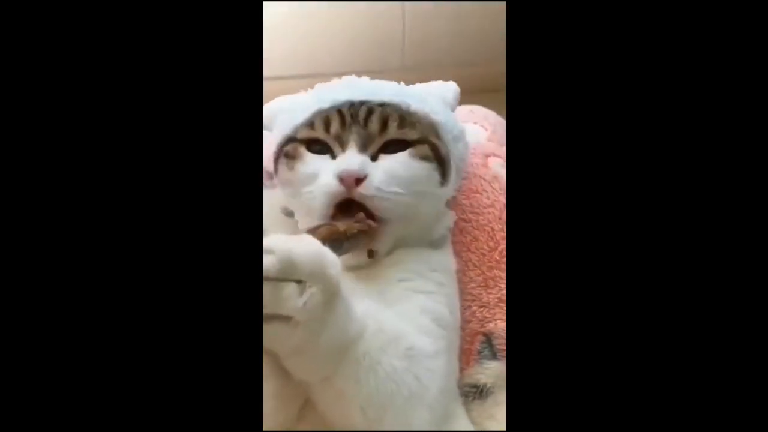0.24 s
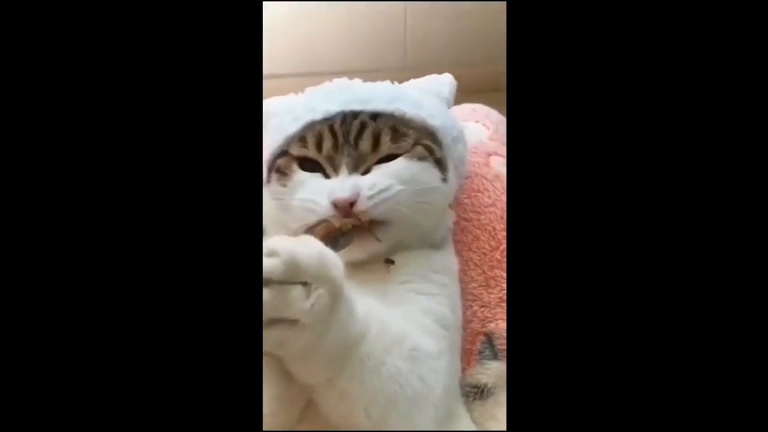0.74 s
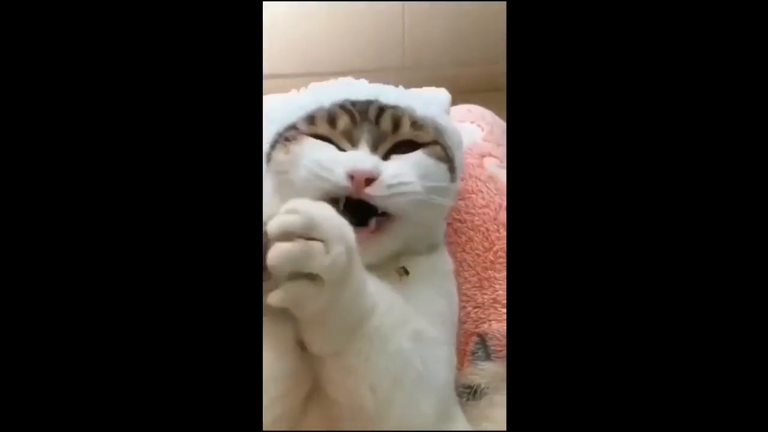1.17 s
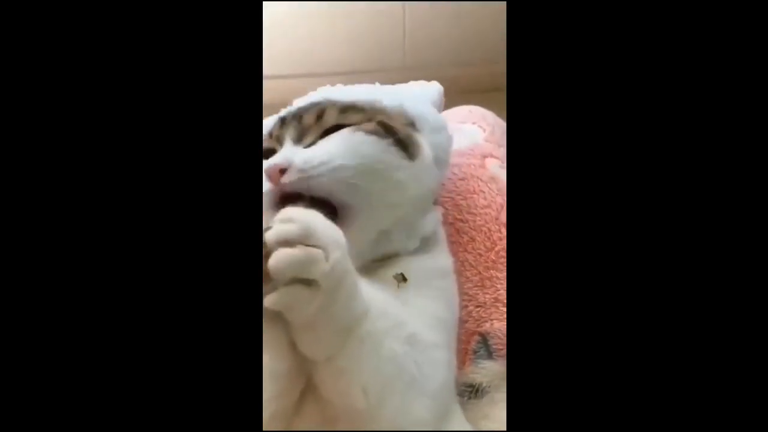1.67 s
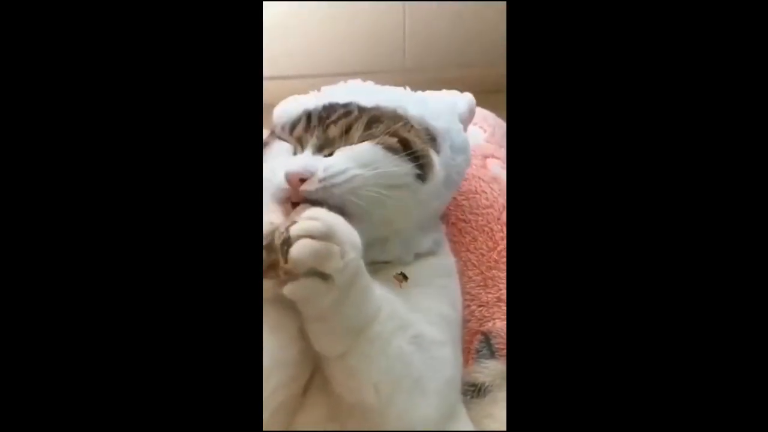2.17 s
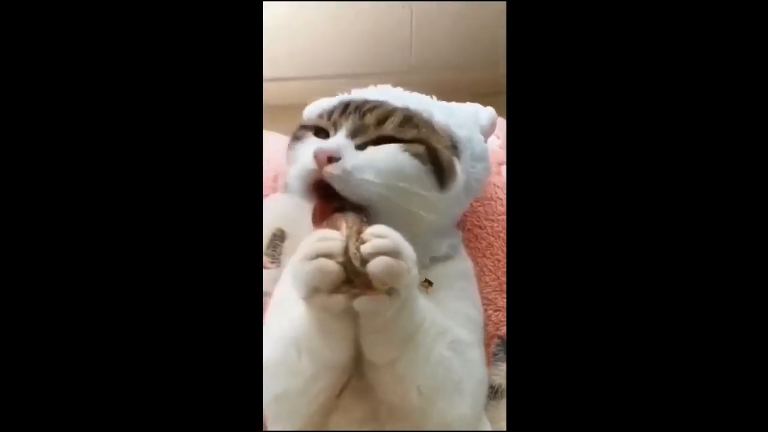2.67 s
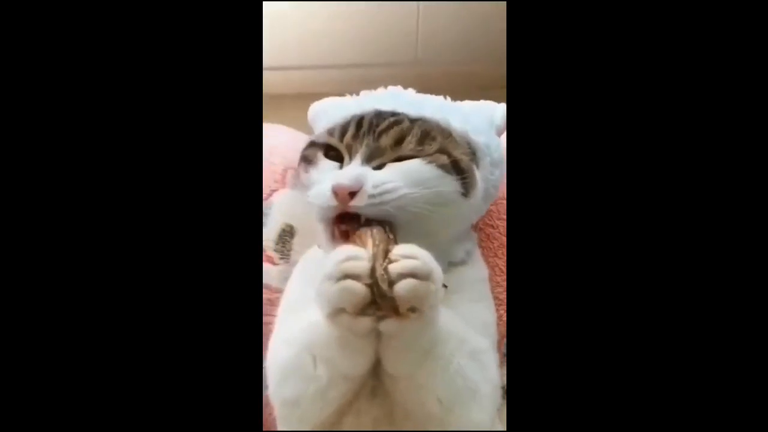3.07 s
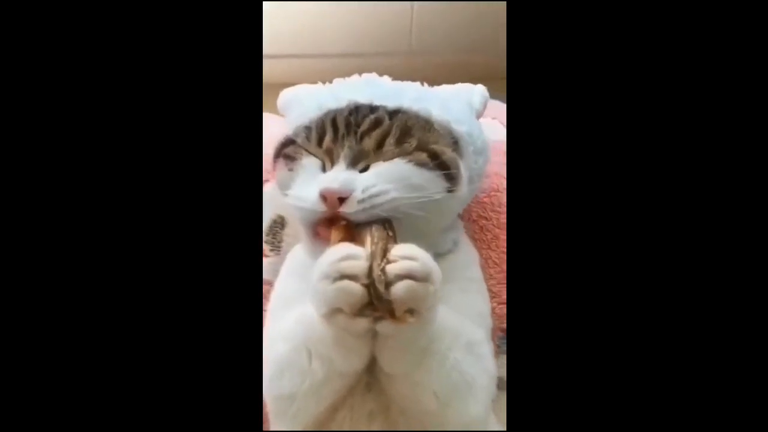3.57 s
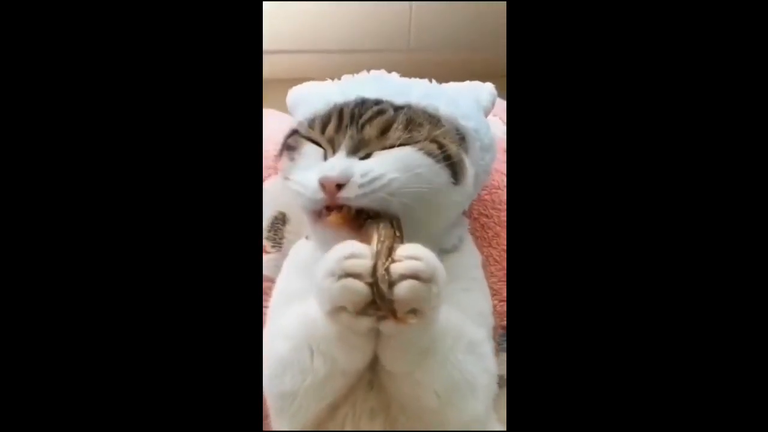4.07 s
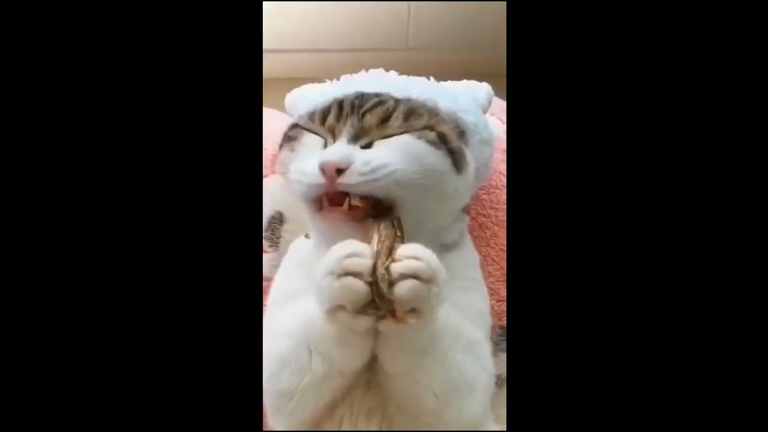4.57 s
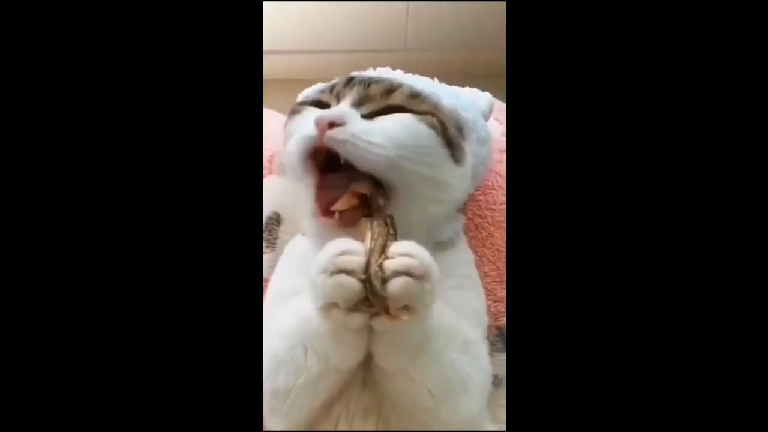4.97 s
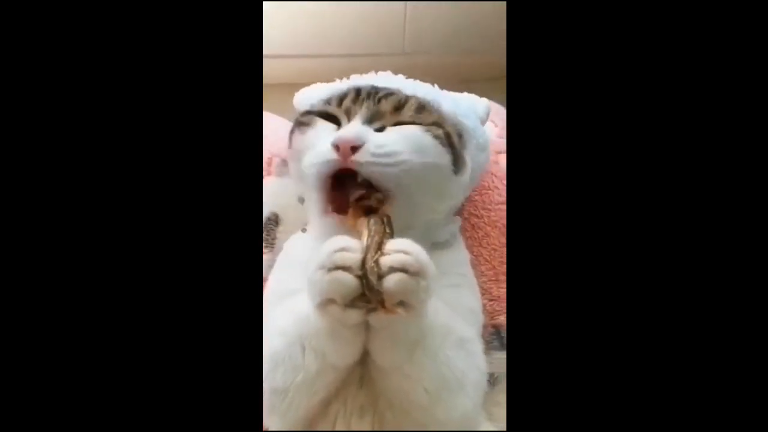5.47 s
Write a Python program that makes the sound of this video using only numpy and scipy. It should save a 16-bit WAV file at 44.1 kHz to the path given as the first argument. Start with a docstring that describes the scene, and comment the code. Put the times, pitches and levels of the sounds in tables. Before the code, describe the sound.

A cat chews a hard dried treat very close to a hand-held microphone in a small room. For the first second there are only soft chews and small wet clicks, with some low handling rumble. From about 1.2 seconds loud, sharp cracks and gritty grinding set in, easing briefly near 1.6. The densest, loudest crunching runs from about 1.9 to 2.7 seconds, with short wet squelches, and the microphone rumbles low between 2.5 and 2.8. Strong grinding bites follow near 2.9 and 3.2 seconds. After that the chewing turns lighter and more splintery, in uneven clusters around 3.9 to 4.2, 4.6 to 4.8 and 5.2 to 5.5 seconds. Each bite is a brittle crackle with a slightly hollow mouth sound, and little pops of tongue and teeth come between them. Faint steady room noise continues until the end at about 5.7 seconds.

```python
"""A small furnished room, a hand-held microphone very close to a cat that gnaws a hard dried treat in its paws.
Each stroke of the jaw grinds through the fibres and sheds crumbs; each crack is a short avalanche of
tiny fractures. Jaw, mouth and treat ring with them, and tongue and teeth add wet pops.
Handling rumble and room noise lie under it all, and a limiter holds down the loudest bites."""
import sys
import numpy as np
from scipy import signal
from scipy.fft import rfft, irfft
from scipy.io import wavfile
from scipy.ndimage import uniform_filter1d, minimum_filter1d

SR = 44100
rng = np.random.default_rng(int(sys.argv[2]) if len(sys.argv) > 2 else 0)


def dump_mix(stems):
    """Bounce the given channels to the path in sys.argv[1] as a 16-bit WAV at rate SR."""
    frames = np.atleast_2d(stems).T  # one column per channel
    limited = np.clip(frames, -1, 1)  # hard clip at full scale
    pcm = np.round(limited * 32767).astype(np.int16)
    wavfile.write(sys.argv[1], SR, pcm)


N = 252693

# Spectra of the room tone and the handling rumble. Each row: frequency in Hz, relative density in dB.
ROOM_TONE_SPECTRUM = [(60, 14.5), (150, 10), (280, 5.5), (450, -2.5), (1000, -5), (2500, -11.5),
                      (4500, -15), (7000, -36.5), (9500, -23)]
RUMBLE_SPECTRUM = [(15, -4), (24, 0), (35, -4.5), (50, -1.5), (70, -11), (110, -23), (200, -33),
                   (400, -46.5)]
# Shifts of the hand on the microphone. Each row: start in seconds, hold in seconds, level in dB.
HAND_SHIFTS = [(0.0, 0.11, -15.5), (0.17, 0.02, -14), (0.329, 0.092, -13), (0.514, 0.03, -19.5),
               (0.657, 0.015, -16.5), (0.766, 0.032, -22.5), (0.91, 0.015, -23.5), (1.363, 0.03, -27.5),
               (1.67, 0.02, -30), (2.546, 0.034, -8.5), (2.69, 0.051, -8.5), (2.802, 0.023, -8),
               (3.106, 0.016, -21.5), (3.261, 0.01, -23), (3.988, 0.023, -15), (4.219, 0.089, -15.5),
               (4.906, 0.016, -20.5), (5.232, 0.03, -31)]

# Resonances of the five ringing parts, before the bite shifts them.
# Each row: frequency in Hz, bandwidth in Hz, relative strength in dB.
JAW_MODES = [(260, 290, -6.5), (407, 110, 2), (523, 123, -0.5), (790, 370, -13.5)]
MOUTH_MODES = [(880, 130, -10), (1076, 103, 10.5), (1222, 560, 3), (1380, 160, -9)]
TREAT_MODES = [(1750, 405, -1.5), (2120, 640, -1.5), (2365, 266, 1.5), (2852, 320, -6)]
SPLINTER_MODES = [(3130, 213, 0.24), (4253, 430, 0.92), (5790, 1150, -0.61), (6680, 1020, 0.1)]
FINE_FIBRE_MODES = [(7380, 570, -6.8), (8960, 290, 2.5), (10400, 610, 4)]
# The band each of those parts radiates, in the same order. Each row: low edge in Hz, high edge in Hz.
PART_BANDS = [(190, 830), (760, 1520), (1400, 6140), (3200, 6980), (6700, 8570)]
# At a crack an open mouth rings more and the jaw less.
# Each row: time in seconds, dB added to the mouth and taken from the jaw.
OPEN_MOUTH = [(0.0, -2), (0.87, -9.5), (1.22, 6.5), (1.5, -2), (1.95, 6), (2.45, -1.5), (3.4, 2),
              (3.97, -2), (4.15, 3), (4.7, -2), (5.73, -3)]

# Pitched mouth sounds, from short pops and knocks to long squelches and scrapes.
# Each row: start in seconds, length in seconds, pitch in Hz, level in dB.
MOUTH_POPS = [(0.008, 0.05, 1120, -30), (0.3398, 0.00073, 2200, -17.5), (0.7446, 0.00094, 2380, -21),
              (0.893, 0.027, 1750, -29), (0.899, 0.049, 1030, -28.5), (1.105, 0.00092, 3130, -17.5),
              (1.179, 0.0017, 2490, -23), (1.189, .004, 2460, -18.5), (1.2189, 0.0017, 2430, -12.5),
              (1.2204, .002, 1140, -13), (1.753, 0.023, 285, -22), (1.759, 0.018, 1170, -17),
              (1.795, 0.15, 2280, -18.5), (2.013, 0.0016, 1097, -13), (2.449, 0.076, 3640, -9.5),
              (2.574, 0.013, 348, -18.5), (2.692, 0.069, 1930, -16), (3.078, 0.045, 260, -25.5),
              (3.26, .0043, 2470, -16), (3.4, 0.0039, 1046, -16), (3.4007, 0.00085, 511, -16),
              (3.665, 0.019, 1800, -20), (3.739, 0.073, 1750, -21.5), (3.896, 0.016, 3000, -11),
              (3.964, 0.0036, 337, -19.5), (4.25, 0.0034, 550, -15), (4.44, .0012, 1790, -26.5),
              (4.444, .063, 1810, -29.5), (4.611, 0.027, 2820, -13), (4.74, .003, 428, -20),
              (4.852, 0.0024, 446, -17.5), (5.244, .0015, 1070, -18.5), (5.55, 0.044, 2560, -29)]
# Faint rubbing of the treat between strokes. Each row: time in seconds, level in dB.
TREAT_RUBBING = [(0.0, -46), (1.05, -46.5), (1.7, -43.5), (2.8, -32), (3.6, -41), (4.4, -41), (4.8, -33.5),
                 (5.0, -43.5), (5.5, -35), (5.73, -39.5)]
# Strokes of the jaw through the fibres. Each row: start in seconds, hold in seconds, level in dB,
# then hollow ring (jaw and mouth) and splinters, both in dB relative to that level.
JAW_STROKES = [(0.066, 0.012, -32, -18, -23), (0.406, 0.015, -29, -13, -30), (0.742, 0.011, -35, -3.5, -12),
               (0.86, 0.01, -35.5, -6, 3.5), (1.112, 0.012, -29, -4.5, -10), (1.192, 0.015, -28.5, -8, -11),
               (1.29, 0.078, -22, -2, -7.5), (1.391, 0.097, -17.5, -11.5, -3.5),
               (1.538, 0.016, -24.5, 0, -6), (1.653, 0.15, -30, -4.5, -9), (1.906, 0.0088, -19, -2.5, -7),
               (1.961, 0.12, -19, -5, -0.5), (2.119, 0.27, -16.5, -11.5, 0), (2.44, 0.058, -18, -10, -2.5),
               (2.543, 0.22, -24.5, -13, -5), (2.912, 0.085, -15.5, -9, 0.5), (3.231, 0.11, -19, -8.5, 1.5),
               (3.39, 0.16, -33, -5, 1.5), (3.637, 0.012, -29.5, -9.5, -1),
               (3.749, 0.025, -26, -15.5, -7.5), (3.889, 0.033, -21.5, -10, -0.5),
               (3.995, 0.047, -29.5, 0, 8), (4.118, 0.029, -32, -3.5, 5.5), (4.253, 0.011, -30, 4.5, -0.5),
               (4.604, 0.08, -22.5, -9.5, 3), (4.832, 0.01, -32, 2, 10.5), (5.177, 0.081, -22, -5.5, 2.5),
               (5.302, 0.057, -24, -5.5, 5), (5.452, 0.033, -36, 5, 10)]
# The distinct cracks. Each row: start in seconds, length in seconds, level of the treat's ring in dB,
# then hollow ring and splinters, both in dB relative to that level.
TREAT_CRACKS = [(0.655, 0.0041, -45.5, -5, 15), (0.84, 0.0013, -31.5, -14, 6.5),
                (0.872, 0.0015, -36.5, 1.5, 13), (1.107, 0.0015, -23.5, -21, -10),
                (1.216, 0.0019, -20, -7, -9), (1.265, 0.0068, -8.5, -8.5, -17.5),
                (1.304, 0.011, -16, -28, -4.5), (1.343, 0.0059, -11, -15, -8), (1.41, 0.019, -14, -15, 0.5),
                (1.455, 0.0088, -14, -5, 1.5), (1.551, 0.0011, -21, -10, -19),
                (1.659, 0.0022, -19.5, -10.5, -4), (1.737, 0.0066, -19.5, -14.5, -3.5),
                (1.903, 0.0044, -7.5, -12.5, -8.5), (1.939, 0.012, -7.5, -8.5, -12),
                (1.988, 0.024, -15, -6.5, -4.5), (2.031, .004, -16, -15, -4),
                (2.058, .0016, -23.5, -4, 4.5), (2.129, .0031, -15.5, -16.5, -3),
                (2.209, 0.0074, -13, -9.5, -3), (2.267, 0.007, -13.5, -10.5, -3.5),
                (2.308, 0.002, -21, -10.5, -1), (2.333, .0018, -18, -10, 0), (2.39, 0.0041, -13, -14, -2),
                (2.427, 0.011, -9.5, -9, -3.5), (2.489, 0.0026, -17.5, -32, -13),
                (2.509, 0.0089, -11.5, -19.5, -4), (2.54, 0.0096, -12, -17, -4),
                (2.577, 0.0055, -20, -17, -7), (2.602, 0.0018, -16, -12, -7.5),
                          (2.685, 0.0053, -17.5, -11, -8.5), (2.702, 0.0051, -19.5, -15, -10.5),
                (2.788, 0.0029, -21, -21, -6), (2.883, 0.014, -15.5, -27, 2.5),
                (3.017, 0.0035, -22.5, -8, 5.5), (3.178, 0.0029, -28, -26, 1),
                (3.213, 0.0042, -24.5, -20, 3.5), (3.271, 0.0018, -20.5, -5.5, -8),
                (3.396, 0.0042, -17, -3, -3), (3.474, 0.0036, -23, -11, 5),
                (3.515, 0.003, -18.5, -9.5, 0.5), (3.547, .011, -29.5, -7, 4.5), (3.623, .004, -26, -10, 2),
                (3.664, 0.0019, -31, -0.5, -0.5), (3.731, 0.0032, -25, -20, -3.5),
                (3.841, 0.0036, -27, -25, 2), (3.904, 0.005, -18, -30, -0.5), (3.964, 0.0043, -11, -13, -3),
                (4.08, 0.0058, -23.5, -4, 8), (4.117, 0.0022, -19, -10, 2), (4.204, 0.0085, -22.5, -2, 3.5),
                (4.249, 0.0033, -23.5, 3.5, 0), (4.399, 0.0016, -35.5, -13, 3.5),
                (4.556, .0039, -33, -24, 6), (4.593, 0.018, -23.5, -24, 7), (4.651, .0051, -20, -10, 1.5),
                (4.675, 0.0021, -14, -18, -7), (4.733, 0.0067, -17, -5, 2), (4.798, 0.004, -33.5, 0, 11.5),
                (4.845, 0.0043, -23, 2, 2), (4.94, 0.0046, -39.5, -23, 9.5),
                (5.162, 0.0027, -34, -19, 12.5), (5.174, 0.01, -16.5, -25, 3), (5.22, .002, -18.5, -11, 2),
                (5.276, 0.0078, -16.5, -7.5, 3.5), (5.31, 0.0077, -25, -13, 8),
                (5.341, 0.0094, -31, -4, 1.5), (5.432, .0025, -36.5, -6, 14),
                (5.458, 0.0031, -20, -0.5, 3.5)]


def from_db(db):
    """Decibels to gain."""
    return 10 ** (np.asarray(db) / 20)


def rms_one(x):
    """Scale to an rms of 1."""
    return x / np.sqrt(np.mean(x ** 2) + 1e-20)


def energy_one(x):
    """Scale to an energy of 1."""
    return x / np.sqrt(np.sum(x ** 2) + 1e-20)


def evened(x, span_s):
    """Hold the rms near 1 over the given span, keeping all faster detail."""
    return x / np.sqrt(np.abs(uniform_filter1d(x ** 2, int(span_s * SR))) + 1e-12)


def swell(start_s, hold_s, rise_db_per_s, fall_db_per_s):
    """A gain over time that reaches full at start_s, holds and falls away."""
    age = np.arange(N) / SR - start_s
    return from_db(np.clip(np.minimum(age * rise_db_per_s, (hold_s - age) * fall_db_per_s), -120, 0))


def add(out, start_s, sound, db):
    """Mix in a sound with the energy of 10 ms at the given rms level."""
    start = int(start_s * SR)
    sound = from_db(db) * np.sqrt(SR / 100) * energy_one(sound)
    out[start:start + len(sound)] += sound[:N - start]


def coloured_noise(spectrum):
    """Steady noise with the given spectrum, rms 1."""
    hz, db = np.transpose(spectrum)
    bin_hz = np.maximum(np.fft.rfftfreq(N, 1 / SR), 1)
    gain = from_db(np.interp(np.log(bin_hz), np.log(hz), db, left=-60, right=-90))
    return rms_one(irfft(rfft(rng.standard_normal(N)) * gain, N))


def room(x, near_db, near_t60_s, far_db, far_t60_s, dull_hz):
    """The direct sound, quick reflections from things nearby, then a short, duller tail."""
    t = np.arange(SR // 2) / SR
    near, far = rng.standard_normal((2, len(t))) * (t > .002)
    far = signal.sosfilt(signal.butter(1, dull_hz, fs=SR, output="sos"), far)
    reflections = from_db(near_db) * energy_one(near * from_db(-60 * t / near_t60_s))
    tail = from_db(far_db) * energy_one(far * from_db(-60 * t / far_t60_s))
    return x + signal.oaconvolve(x, reflections + tail)[:N]


def handling(gain_db, steady_hand_db):
    """Slow, lumpy rumble as the hand that holds the microphone shifts."""
    power = from_db(steady_hand_db) ** 2
    for start, hold, db in HAND_SHIFTS:
        nudge = from_db(db) * swell(start, hold, rise_db_per_s=400, fall_db_per_s=176)
        power = power + nudge ** 2
    return from_db(gain_db) * np.sqrt(power) * evened(coloured_noise(RUMBLE_SPECTRUM), span_s=.06)


def fractures(per_s, spread_db, size):
    """Clicks at random moments: many small ones, a few large."""
    breaks = rng.random(size) < per_s / SR
    strengths = from_db(spread_db * np.minimum(rng.exponential(1, size), 4))
    return breaks * strengths * rng.choice([-1, 1], size)


def avalanche(length_s, per_s, spread_db, first_snap, fade, rise, size=2600):
    """A first snap sets off a run of clicks that swells and dies; rise and fade scale with length_s."""
    age = np.arange(size) / SR / length_s
    clicks = fractures(per_s, spread_db, size) * (1 - np.exp(-age / rise)) * np.exp(-fade * age)
    clicks[0] = first_snap
    return clicks


def mouth_pops(width_share, tick_db, tick_band_hz):
    """Tongue and teeth set one resonance ringing, with a wet tick; the pitch depends on the jaw's set."""
    out = np.zeros(N)
    wet = signal.butter(2, tick_band_hz, "band", fs=SR, output="sos")
    for start, length, hz, db in MOUTH_POPS:
        half_width = width_share * hz / 2
        cavity = signal.butter(2, [hz - half_width, hz + half_width], "band", fs=SR, output="sos")
        clicks = avalanche(length, per_s=2400, spread_db=4.5, first_snap=5.5,
                           fade=0.92, rise=0.13, size=12000)
        add(out, start, signal.sosfilt(cavity, clicks), db)
        add(out, start, signal.sosfilt(wet, clicks), db + tick_db)
    return out


def part_ring(modes, band_hz, stretch, scatter_db, size=1400):
    """How one part rings after a single fracture; neighbouring modes swing against each other."""
    t = np.arange(size) / SR
    ring = np.zeros(size)
    for k, (hz, width, db) in enumerate(modes):
        strength = (-1) ** k * from_db(db + scatter_db * rng.standard_normal()) * width
        ring += strength * np.exp(-np.pi * width * t) * np.cos(2 * np.pi * hz * stretch * t)
    band = signal.butter(3, np.array(band_hz) * stretch, "band", fs=SR, output="sos")
    return energy_one(signal.sosfilt(band, ring))


def bite_poses(shift, scatter_db, count=13):
    """Where the teeth meet the treat shifts all resonances and favours some: five rings per pose."""
    parts = [JAW_MODES, MOUTH_MODES, TREAT_MODES, SPLINTER_MODES, FINE_FIBRE_MODES]
    stretches = np.exp(shift * np.linspace(-1, 1, count))
    return np.array([[part_ring(modes, band, stretch, scatter_db)
                      for modes, band in zip(parts, PART_BANDS)] for stretch in stretches])


def sizzle_db(splinter_db, treat_db, offset_db=-10, brittleness=0.33):
    """The more a bite splinters, the more the finest fibres sizzle on top of it."""
    return splinter_db + offset_db + brittleness * np.clip(splinter_db - treat_db, -12, 8)


def jaw_effort(rub_hollow_db, rub_splinter_db):
    """Jaw strokes over faint rubbing: level, relative hollow ring and relative splinters in dB over time."""
    rubbing_db = np.interp(np.arange(N) / SR, *np.transpose(TREAT_RUBBING))
    power = from_db([rubbing_db, rubbing_db + rub_hollow_db, rubbing_db + rub_splinter_db]) ** 2
    for start, hold, db, hollow_db, bright_db in JAW_STROKES:
        # the teeth take hold quickly and let go more slowly
        stroke = swell(start, hold, rise_db_per_s=445, fall_db_per_s=270)
        power += from_db([[db], [db + hollow_db], [db + bright_db]]) ** 2 * stroke ** 2
    level, hollow, bright = 10 * np.log10(power)
    return level, hollow - level, bright - level


def grinding(effort, poses, stick_db, slip_s, jaw_db, mouth_db, treat_db, splinter_db, pose_samples=256):
    """Teeth stick and slip through the fibres: fractures come in clumps, each with its own colour."""
    level_db, hollow_db, bright_db = effort
    slips = rms_one(uniform_filter1d(rng.standard_normal(N), int(slip_s * SR)))
    clicks = fractures(per_s=4000, spread_db=2.0, size=N) * from_db(stick_db * slips)
    pose_now = np.repeat(rng.integers(len(poses), size=N // pose_samples + 1), pose_samples)[:N]
    rings = sum(signal.oaconvolve((clicks * (pose_now == k))[None], parts, axes=1)[:, :N]
                for k, parts in enumerate(poses))
    shards_db = bright_db + splinter_db
    parts_db = [hollow_db + jaw_db, hollow_db + mouth_db, treat_db,
                shards_db, sizzle_db(shards_db, treat_db)]
    return sum(from_db(level_db + db) * evened(ring, span_s=0.02) for db, ring in zip(parts_db, rings))


def stalls(crack_lengths, dip_db):
    """Before a crack the teeth stick fast and the grinding's gain sinks, longer before a long crack."""
    stuck = np.zeros(N)
    for start, length, *_ in TREAT_CRACKS:
        stuck[int((start - crack_lengths * length) * SR):int(start * SR)] = 1
    return from_db(dip_db * uniform_filter1d(stuck, size=256))


def crumbs(effort, per_s, length_s, relative_db, spread_db):
    """Small random cracks that follow the grinding in level and colour; rows like TREAT_CRACKS."""
    level_db, hollow_db, bright_db = effort
    moments = np.flatnonzero(rng.random(N) < per_s / SR)
    crumb_db = level_db + relative_db + spread_db * rng.standard_normal(N)
    return [(i / SR, length_s, crumb_db[i], hollow_db[i], bright_db[i]) for i in moments]


def cracks(rows, poses, rise_s):
    """Each crack makes every part ring; the mouth's opening shares the hollow ring with the jaw."""
    out = np.zeros(N)
    for start, length, treat_db, hollow_db, bright_db in rows:
        clicks = avalanche(length, per_s=4500, spread_db=3.0, first_snap=1.63,
                           fade=0.56, rise=rise_s / length)
        open_db = np.interp(start, *np.transpose(OPEN_MOUTH))
        low_db, splinter_db = treat_db + hollow_db, treat_db + bright_db
        parts_db = [low_db - open_db, low_db + open_db, treat_db,
                    splinter_db, sizzle_db(splinter_db, treat_db)]
        pose = poses[rng.integers(len(poses))]
        for ring, db in zip(pose, parts_db):
            add(out, start, signal.fftconvolve(clicks, ring), db)
    return out


def scene():
    """The cat chewing right at the microphone, over handling rumble and room tone; mono."""
    rumble = handling(gain_db=0.5, steady_hand_db=-35)
    room_tone = from_db(-36.5) * coloured_noise(ROOM_TONE_SPECTRUM)
    poses = bite_poses(shift=0.1, scatter_db=2.5)
    effort = jaw_effort(rub_hollow_db=-5.5, rub_splinter_db=-1)
    pops = mouth_pops(width_share=0.23, tick_db=-22.5, tick_band_hz=[1190, 8000])
    fibres = grinding(effort, poses, stick_db=-0.56, slip_s=0.004,
                      jaw_db=-8, mouth_db=-5.0, treat_db=-3.44, splinter_db=-2.02)
    fibres *= stalls(crack_lengths=1.27, dip_db=-1.5)
    crumb_rows = crumbs(effort, per_s=25, length_s=.003, relative_db=-3.5, spread_db=2.5)
    bites = cracks(TREAT_CRACKS + crumb_rows, poses, rise_s=0.0023)
    chewing = room(bites + pops + fibres, near_db=-15, near_t60_s=0.065,
                   far_db=-15, far_t60_s=.22, dull_hz=3770)
    return (chewing + rumble + room_tone)[None]


def record(dry, ceiling=.93, limiter_samples=48, cutoff_hz=9800):
    """Behind the microphone a fast limiter holds down the loudest bites, then the top is cut."""
    needed_gain = np.minimum(1, ceiling / (np.abs(dry) + 1e-9))
    gain = uniform_filter1d(minimum_filter1d(needed_gain, limiter_samples), limiter_samples)
    top_cut = signal.firwin(301, cutoff_hz, fs=SR)
    return signal.oaconvolve(dry * gain, top_cut[None], mode="same", axes=1)


dry = scene()
out = record(dry)
dump_mix(out)
```